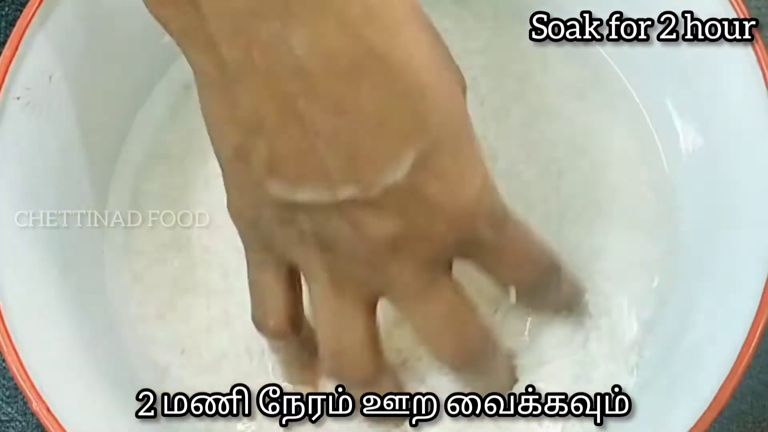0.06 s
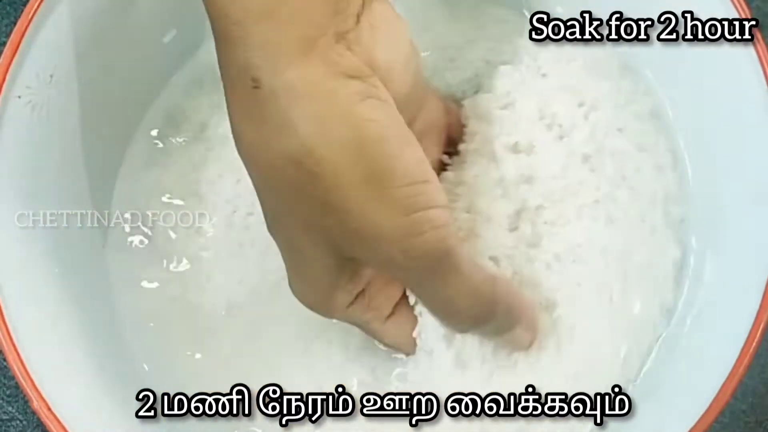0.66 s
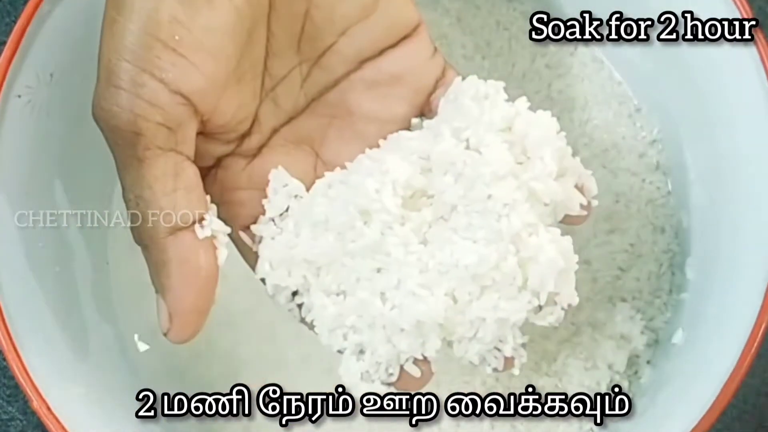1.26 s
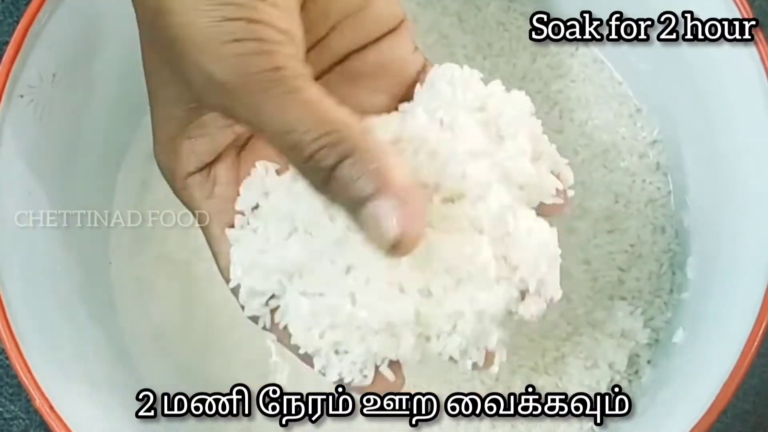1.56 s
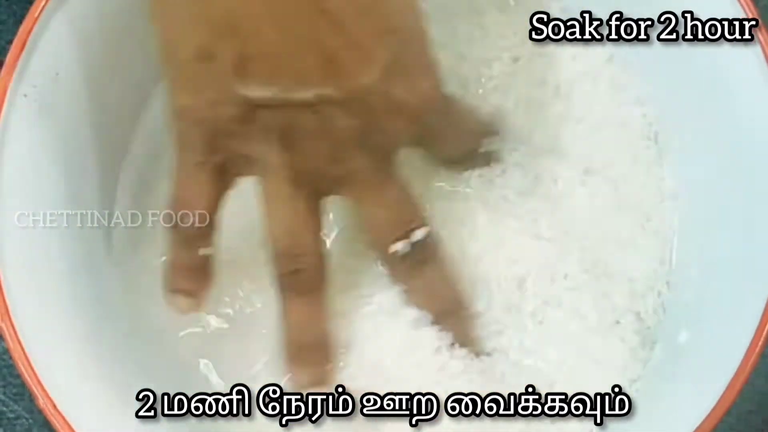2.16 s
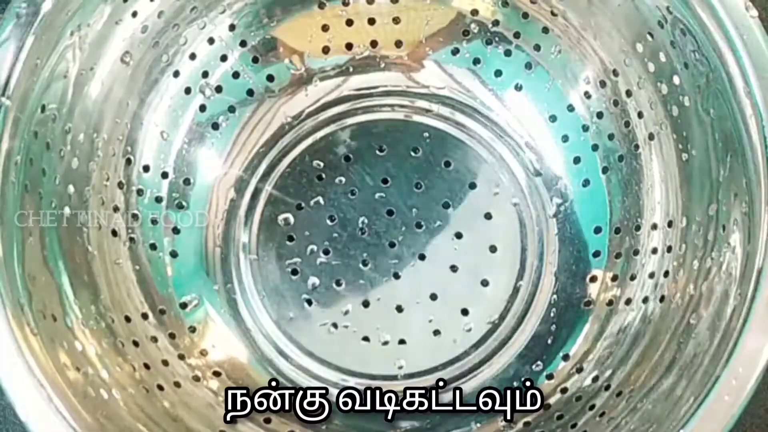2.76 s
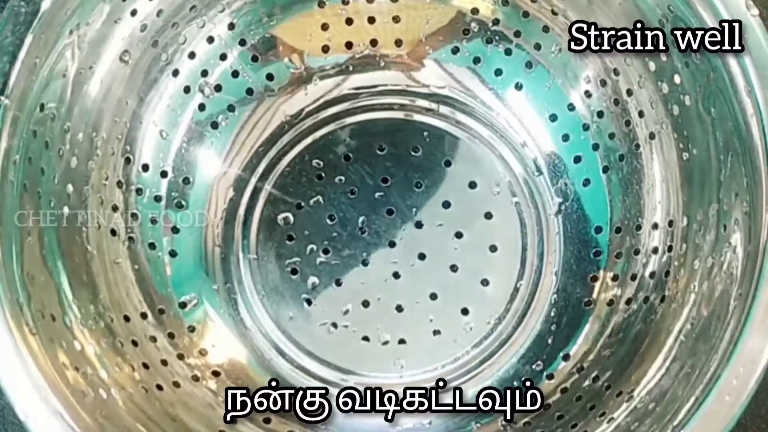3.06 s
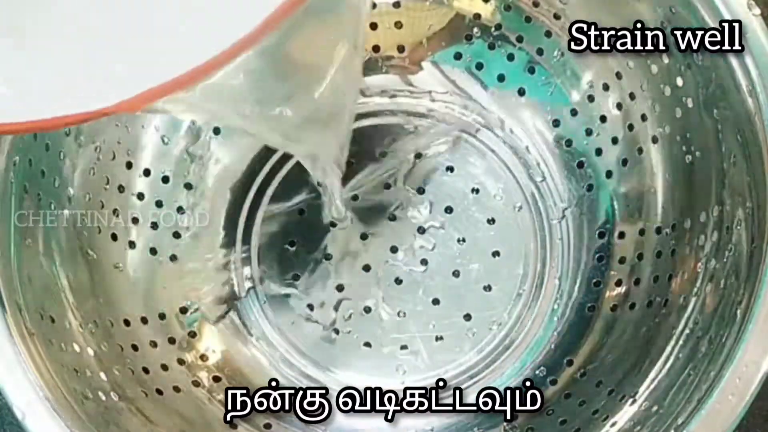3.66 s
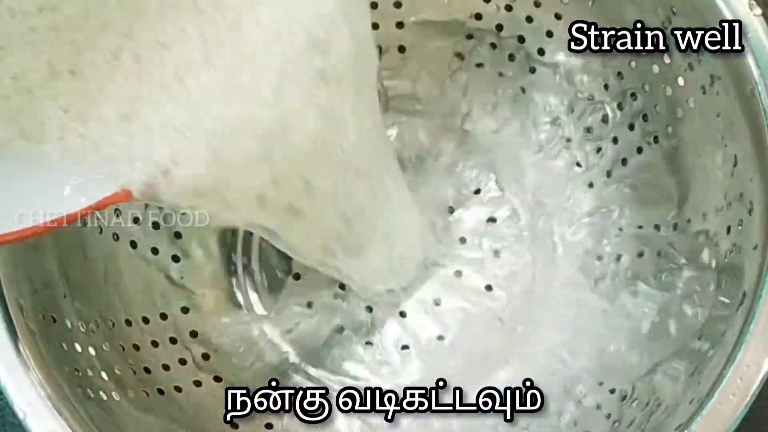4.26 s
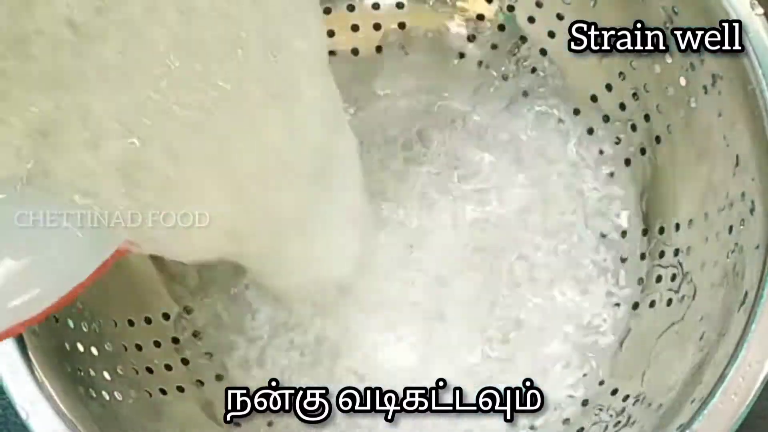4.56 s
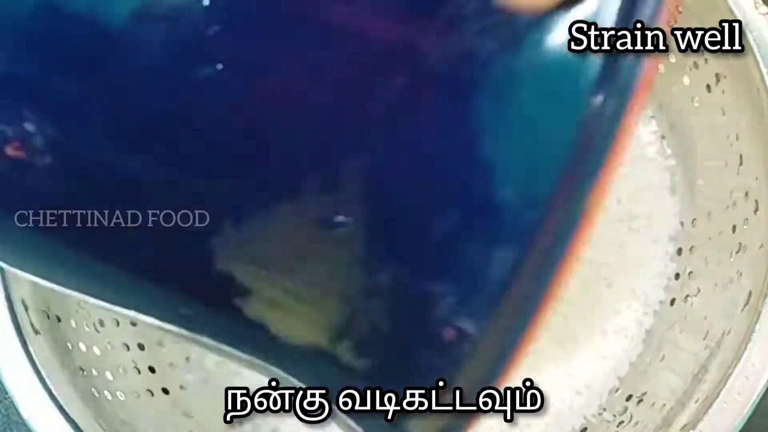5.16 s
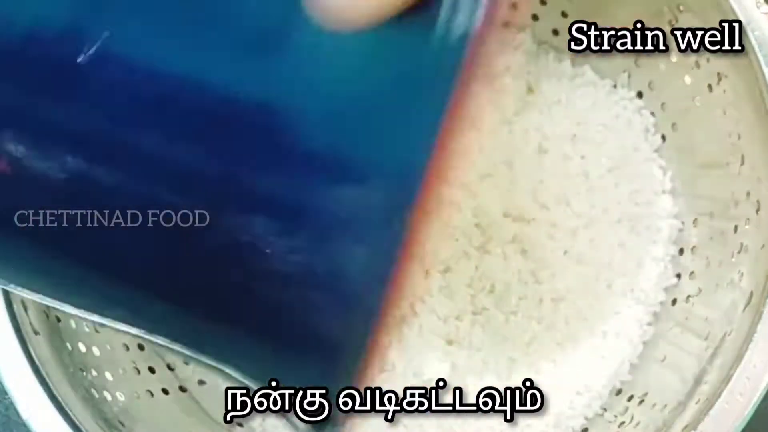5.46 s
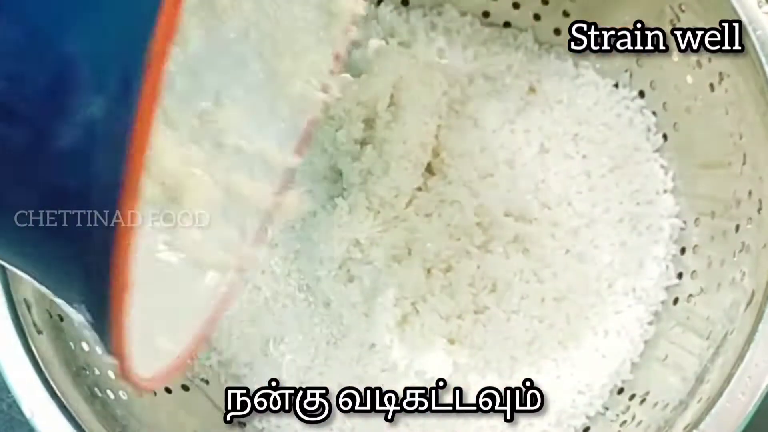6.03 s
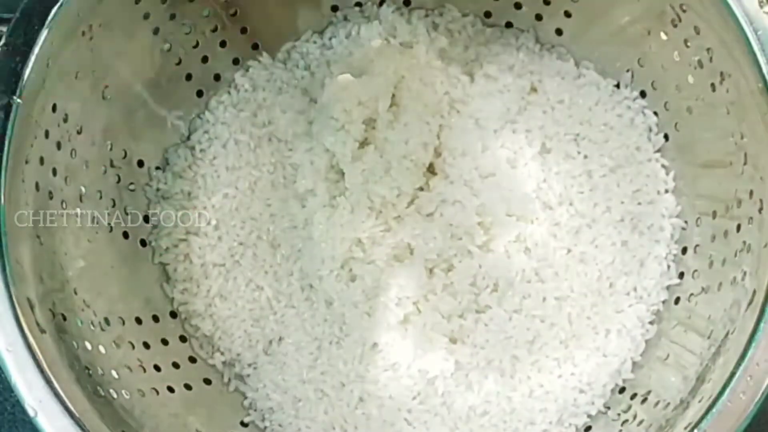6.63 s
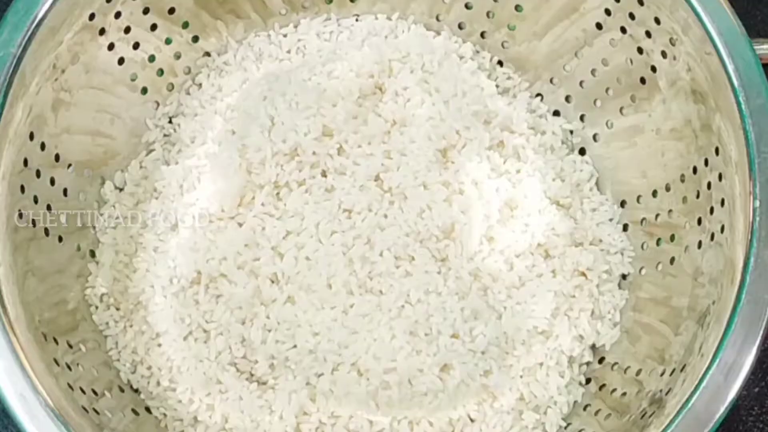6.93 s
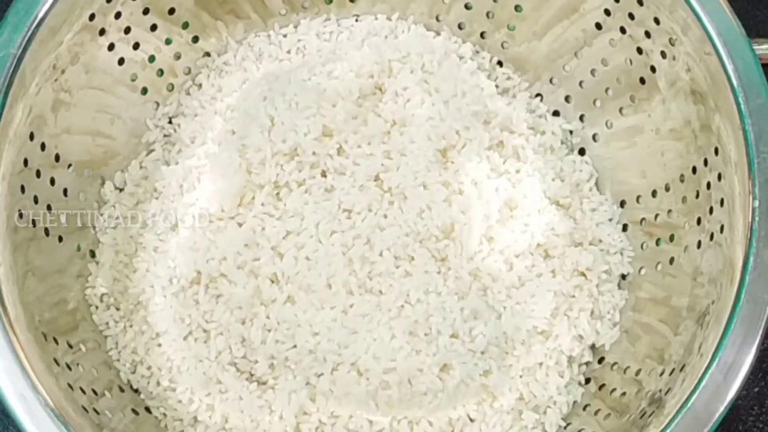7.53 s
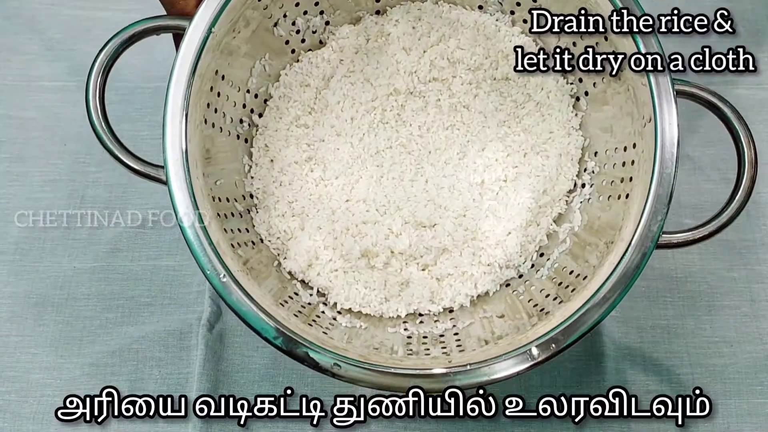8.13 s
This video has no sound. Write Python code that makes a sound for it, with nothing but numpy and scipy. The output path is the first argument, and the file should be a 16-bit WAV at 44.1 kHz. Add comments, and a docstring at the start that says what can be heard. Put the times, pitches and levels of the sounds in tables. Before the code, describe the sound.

Soft sloshing and plinking drips, a knock on steel, then water pours through a colander and wet rice slides after.

```python
"""A small kitchen. A hand stirs soaking rice in a plastic basin and lifts a handful, which drips back:
each drop slaps the water and traps a ringing bubble. The basin knocks a steel colander, water gushes
through it, wet rice slides after in clumps and the rest trickles away. Dull bumps on the worktop and a
low hum lie underneath. The sound comes in three stretches with silence between them."""
import sys
import numpy as np
from scipy import signal
from scipy.fft import rfft, irfft
from scipy.io import wavfile
from scipy.ndimage import uniform_filter1d, map_coordinates

SR = 44100
rng = np.random.default_rng(int(sys.argv[2]) if len(sys.argv) > 2 else 0)


def int16_out(signal):
    """Quantize to a 16-bit WAV file."""
    q = np.round(np.clip(np.atleast_2d(signal).T, -1, 1) * 32767)
    wavfile.write(sys.argv[1], SR, q.astype(np.int16))


N = 365588
TOP_HZ = 16000

# Spectra. Each row: frequency in Hz, relative level in dB.
LOW_SPECTRUM = [(25, -30.5), (55, -23.5), (90, -5.5), (124, 1), (147, -3), (171, 2), (250, -7), (420, -7),
                (600, -13), (1300, -45)]  # room hum, body of a slosh
AIRY_SPECTRUM = [(350, -28.5), (600, -8), (858, -7), (1880, -6.5), (2340, 0), (3250, -12), (3940, -26.5),
                 (4460, -22), (7940, -29), (15100, -32), (16000, -25.5)]  # room air, top of a slosh
DRUM_SPECTRUM = [(60, -26), (130, 7), (240, -9), (450, -11.5), (900, -8.5), (2000, -30.5)]  # drive of a vessel's low note
# Colander modes. Each row: frequency in Hz, level in dB, T60 in seconds.
STEEL_MODES = [(327.5, -16.5, 0.73), (530, -20.5, 0.57), (861, -17.5, 0.076), (1337, -11.5, 0.18),
               (1430, -9, .3), (1644, -11.5, 0.19), (2080, -13.5, 0.35), (2325, -13, 0.41),
               (2321, -4, 0.38), (2550, -14.5, 0.42), (2530, -4, 0.31), (2960, -18, 0.22),
               (4470, -16, 0.16), (5920, -14, .25), (6450, -18, 0.13), (6860, -13.5, 0.17),
               (8140, -16.5, .16)]


def amp(db):
    """Decibels to gain."""
    return 10 ** (np.asarray(db) / 20)


def unit(x):
    """Scale to rms 1."""
    return x / np.sqrt(np.mean(x ** 2) + 1e-20)


def along(points, hz):
    """Interpolate (Hz, value) points on a log frequency axis."""
    f, v = np.transpose(points)
    return np.interp(np.log(hz + 1), np.log(f + 1), v)


def curve_db(rows):
    """Level per sample from (s, dB) rows; -120 dB outside them."""
    return np.interp(np.arange(N) / SR, *np.transpose(rows), left=-120, right=-120)


def wobble(per_s):
    """Smooth random curve with per_s knots a second."""
    return map_coordinates(rng.standard_normal(int(N * per_s / SR) + 4), [np.arange(N) * per_s / SR])


def swells(rows, release=1):
    """Gain from (peak s, dB, rise s) rows: Gaussian rise, exponential decay over release * rise."""
    gain, t = np.zeros(N), np.arange(N) / SR
    for peak_s, db, rise_s in rows:
        u = (t - peak_s) / rise_s
        gain += amp(db) * np.exp(-np.where(u < 0, u ** 2, u / release))
    return gain


def held(start_s, end_s, rise_s, fade_s):
    """Gain of 1 from start_s to end_s, with exponential flanks."""
    t = np.arange(N) / SR
    return np.exp(-np.maximum(start_s - t, 0) / rise_s - np.maximum(t - end_s, 0) / fade_s)


def add(track, start_s, sound):
    """Mix a sound into the track."""
    part = track[max(round(start_s * SR), 0):][:len(sound)]
    part += sound[:len(part)]


def coloured(x, spectrum, size=4096):
    """Minimum-phase filter of energy 1, shaped by (Hz, dB) points."""
    cepstrum = irfft(np.log(amp(along(spectrum, np.fft.rfftfreq(size, 1 / SR)))))
    cepstrum[1:size // 2] *= 2
    cepstrum[size // 2 + 1:] = 0
    response = irfft(np.exp(rfft(cepstrum)))
    return signal.fftconvolve(x, response / np.linalg.norm(response))[:len(x)]


def resonance(x, hz, width_hz):
    """One resonance whose pitch follows hz, rms 1."""
    turn = np.exp(2j * np.pi * np.cumsum(hz * np.ones(N)) / SR)
    pole = np.exp(-np.pi * width_hz / SR)
    return unit((turn * signal.lfilter([1], [1, -pole], x / turn)).real)


def ring(modes, t60_scale=1):
    """Half a second of a struck body's decaying modes."""
    t = np.arange(SR // 2) / SR
    return sum(amp(db - 60 * t / (t60_s * t60_scale)) * np.sin(2 * np.pi * (hz * t + rng.random()))
               for hz, db, t60_s in modes)


def impacts(per_s, spread_db):
    """Tiny blows of uneven size at random moments, rms 1."""
    chance, size, sign = rng.random(N), rng.standard_normal(N), rng.choice([-1, 1], N)
    return unit((chance < per_s / SR) * sign * amp(spread_db * np.minimum(size, 2)))


def bubble(t, hz, life_s, glide, rise_cycles):
    """A trapped bubble rings up, rises in pitch and is choked at the surface."""
    tone = np.sin(2 * np.pi * hz * t * (1 + glide * t / life_s))
    return tone * amp(-60 * (t / life_s) ** 1.37) * (1 - np.exp(-t * hz / rise_cycles))


def bubbles(per_s, centre_hz, octaves, cycles, spread_db):
    """A swarm of bubbles of random pitch and level, rms 1."""
    most, samples = 6000, np.arange(800)
    start = rng.integers(0, N, (most, 1))
    pitch, level = np.clip(rng.standard_normal((2, most, 1)), -2, 2)
    n = int(np.clip(per_s * N / SR, 1, most))
    hz = np.minimum(centre_hz * 2 ** (octaves * pitch[:n]), TOP_HZ)
    rings = amp(spread_db * level[:n]) * bubble(samples / SR, hz, cycles / hz, 0.052, rise_cycles=2.4)
    return unit(np.bincount((start[:n] + samples).ravel(), rings.ravel(), N)[:N])


def spatter(per_s, centre_hz, octaves, spread_db):
    """Separate droplets: ticks of a few cycles and some tiny bubbles, rms 1."""
    ticks = bubbles(per_s, centre_hz, octaves, cycles=9, spread_db=spread_db)
    pings = bubbles(per_s / 4, centre_hz * .8, octaves, cycles=45, spread_db=spread_db)
    return unit(ticks + amp(-8) * pings)


def vessel(x, t60_s, wall_db):
    """Sound bounces between a vessel's close walls, rms 1."""
    t = np.arange(SR // 10) / SR
    echoes = rng.standard_normal(len(t)) * amp(-60 * t / t60_s)
    return unit(x + amp(wall_db) * signal.fftconvolve(x, echoes / np.linalg.norm(echoes))[:N])


def background():
    """Low hum, airy noise, one rustle and a faint whine that gives way to thin hiss near the end."""
    # Room noise steps. Each row: start in seconds, hum in dB, air in dB, pitch ratio of the air.
    steps = [(0, -66.5, -72, 0.92), (3.105, -66.5, -67, 0.91), (7.037, -66, -68.5, 1.07),
             (7.645, -70, -72.5, 1.05)]
    # Hiss spectrum and whine tones. Each row: frequency in Hz, level in dB.
    hiss_spectrum = [(4500, -48.5), (5500, -14), (6300, 2), (7800, -2.5), (8400, -5), (9200, -39)]
    whine_tones = [(2256, -83), (2912, -83), (3160, -84.5)]
    start_s, hum_db, air_db, ratios = np.transpose(steps)
    t = np.arange(N) / SR
    step = np.searchsorted(start_s[1:], t)
    hum = amp(hum_db[step]) * coloured(rng.standard_normal(N), LOW_SPECTRUM)
    noise = rng.standard_normal(N)
    airy = sum((step == k) * coloured(noise, np.multiply(AIRY_SPECTRUM, [ratio, 1]))
               for k, ratio in enumerate(ratios))
    rustle = swells([(7.09, -63, .055)])
    air = np.hypot(amp(air_db[step] + 0.64 * wobble(5)), rustle) * airy
    hiss = amp(-76) * coloured(rng.standard_normal(N), hiss_spectrum)
    whine = sum(amp(db + wobble(5)) * np.sqrt(2) * np.sin(2 * np.pi * hz * t + wobble(5.2))
                for hz, db in whine_tones)
    return hum + air + np.where(step == len(steps) - 1, hiss, whine)


def slosh():
    """Water rocks in a vessel: a low wash with a lighter top, rms 1."""
    wash = coloured(rng.standard_normal(N), LOW_SPECTRUM)
    return unit(wash + amp(-0.5) * coloured(impacts(per_s=3800, spread_db=2), AIRY_SPECTRUM))


def stirring():
    """Fingers rake wet grains in rocking water; the hand lifts, the basin hums and droplets patter."""
    # Raked grains. Each row: frequency in Hz, relative level in dB.
    swish_spectrum = [(300, -19.5), (1100, -19.5), (1700, -17.5), (2350, -4), (3900, -21), (5100, -11),
                      (8100, -18), (9800, -15), (16000, -18)]
    # Finger strokes. Each row: peak in seconds, level in dB, rise in seconds.
    strokes = [(.31, -72.5, 0.18), (.73, -66.5, 0.032), (1.55, -64.5, 0.032), (1.657, -41, 0.00617),
               (1.762, -39.5, 0.024), (1.81, -46.5, 0.032), (1.855, -40, 0.018), (2.01, -54, 0.049)]
    # Rocking of the water. Each row: time in seconds, level in dB.
    slosh_levels = [(.05, -67.5), (.25, -63.5), (.85, -66.5), (1.5, -62), (2.0, -57.5), (2.3, -61.5),
                    (2.58, -61)]
    grains = impacts(per_s=4500, spread_db=4.5)
    grains += amp(-1) * spatter(per_s=500, centre_hz=6000, octaves=.8, spread_db=4.5)
    hollow = resonance(coloured(rng.standard_normal(N), DRUM_SPECTRUM), hz=425, width_hz=28.4)
    swish = vessel(coloured(grains, swish_spectrum), t60_s=.05, wall_db=-10)
    rocking = amp(curve_db(slosh_levels)) * (slosh() + amp(-19.5) * swish)
    droplets = spatter(per_s=48, centre_hz=8000, octaves=1, spread_db=5)
    patter = vessel(droplets, t60_s=.05, wall_db=-2)
    lifted = amp(-69.5) * held(0.68, 1.346, rise_s=.1, fade_s=.1)
    dripping = amp(-76.5) * held(0.917, 2.17, rise_s=0.011, fade_s=0.13)
    return swells(strokes) * swish + rocking + lifted * hollow + dripping * patter


def bumps():
    """A soft push wakes the worktop modes near its own pitch."""
    # Pushes. Each row: start in seconds, level in dB, pitch in Hz.
    pushes = [(0.1, -45, 253), (1.228, -48, 228), (3.284, -21, 147.2), (3.483, -57, 422),
              (6.016, -41.5, 478), (7.648, -38, 378), (7.655, -29.5, 167.5), (8.236, -57, 440)]
    # Worktop modes. Each row: frequency in Hz, level in dB, T60 in seconds.
    worktop_modes = [(125.7, -7.5, 0.41), (137.2, -13, 0.28), (179.8, -1, 0.29), (209, -2.5, 0.19),
                     (286.4, -1.5, 0.31), (447.4, -2, 0.21), (500.5, -1.5, 0.207)]
    push_s, rise_s = 0.028, 0.0059
    out, t = np.zeros(N), np.arange(SR // 2) / SR
    for start_s, db, hz in pushes:
        modes = [(f, level - 9 * np.log2(f / hz) ** 2, t60_s) for f, level, t60_s in worktop_modes]
        push = np.sin(2 * np.pi * hz * t) * np.sin(np.pi * np.minimum(t / push_s, 1)) ** 2
        body = ring(modes) * (1 - np.exp(-(t / rise_s) ** 2))
        add(out, start_s, amp(db) * (amp(-9) * body + amp(-4.5) * push))
    return out


def drips():
    """Each drop slaps the water and traps a bubble; the restless surface makes its ring flutter."""
    # Drops. Each row: start in seconds, bubble level in dB, bubble pitch in Hz, slap level in dB.
    drops = [(0.917, -48, 5000, -36), (.942, -45, 3380, -37.5), (.958, -36.5, 4780, -42),
             (1.086, -42.5, 4570, -46), (1.119, -28, 2200, -63), (1.16, -41.5, 2170, -51),
             (1.2337, -31.5, 1220, -36), (1.2324, -34, 2280, -48), (1.331, -33.5, 2305, -41.5),
             (1.4254, -30, 1890, -45), (1.531, -36, 2016, -45), (1.549, -47, 1136, -60),
             (1.576, -38, 2070, -80), (1.657, -31, 2520, -44), (1.6915, -39.5, 1920, -32),
             (1.746, -25.5, 2600, -38), (1.7793, -28, 2140, -39.5), (1.8321, -30, 2710, -44),
             (3.563, -39, 5780, -45), (3.604, -45, 3450, -39.5), (3.839, -27.5, 3190, -46),
             (3.862, -29.5, 3050, -35), (3.8971, -23.5, 2340, -24), (3.9516, -20.5, 2265, -27),
             (4.071, -14, 2358, -34.5), (4.156, -8.5, 2030, -37), (4.1685, -11, 2220, -39.5),
             (4.2766, -17, 2426, -39), (4.8444, -9.5, 2380, -27.5), (4.869, -18, 2210, -36.5),
             (4.953, -20, 2310, -22.5), (5.204, -36, 2430, -34), (5.7117, -31.5, 2310, -36)]
    # Mean slap spectrum. Each row: frequency in Hz, relative level in dB.
    slap_spectrum = [(150, -16.5), (600, -13), (1200, -10), (2300, 2.5), (3600, -7), (5000, 1.5),
                     (9000, -6.5), (16000, -5.5)]
    life_cycles, slap_rise_s, slap_t60_s, basin_t60_s = 45, 0.0016, .013, 0.041
    out, t = np.zeros(N), np.arange(SR // 6) / SR
    flutter = amp(3 * wobble(700))
    envelope = amp(-60 * t / slap_t60_s) * (1 - np.exp(-t / slap_rise_s))
    for start_s, bubble_db, hz, slap_db in drops:
        colour = [(f, db + 4 * rng.standard_normal()) for f, db in slap_spectrum]
        slap = coloured(rng.standard_normal(len(t)) * envelope, colour)
        note = bubble(t, hz, life_cycles / hz, glide=.04, rise_cycles=1.2)
        note *= flutter[round(start_s * SR):][:len(t)]
        add(out, start_s, amp(bubble_db) * note + amp(slap_db) * slap)
    walls = rng.standard_normal(len(t)) * amp(-60 * t / basin_t60_s)
    return out + amp(-11.5) * signal.fftconvolve(out, walls / np.linalg.norm(walls))[:N]


def knocks():
    """The basin's rim scrapes the colander and leaves it ringing."""
    # Contacts. Each row: start in seconds, ring in dB, scrape in dB, scrape in seconds, T60 factor.
    contacts = [(3.283, -26.5, -30, 0.031, 0.9), (3.4839, -43, -27, .005, 0.51)]
    # Rim on steel. Each row: frequency in Hz, relative level in dB.
    scrape_spectrum = [(180, -41), (300, -28), (537, 4), (689, -27), (930, -2), (1150, -14.5), (1390, -1),
                       (1780, -10.5), (2320, 6), (3460, -21), (4370, -18), (5520, -17.5), (5900, -12.5),
                       (9240, -18), (16000, -27)]
    out, t = np.zeros(N), np.arange(SR // 2) / SR
    for start_s, ring_db, scrape_db, scrape_s, t60_scale in contacts:
        scrape = coloured(rng.standard_normal(len(t)) / (1 + (t / scrape_s) ** 3), scrape_spectrum)
        steel = ring(STEEL_MODES, t60_scale) * (1 - np.exp(-6 * t / scrape_s))
        add(out, start_s, amp(ring_db) * steel + amp(scrape_db) * scrape)
    return out


def spray(level_db, drops):
    """Water sprays through the holes and drops ring the steel; strong flow merges droplets into hiss."""
    # Spray. Each row: frequency in Hz, relative level in dB.
    spectrum = [(1940, -35.5), (3300, -1), (4020, -21), (4470, 1.5), (5310, -8.5), (5940, 2), (6520, -8.5),
                (7290, -2.5), (8430, -6), (9130, -13.5), (9940, -4.5), (11900, -13.5), (14600, -7),
                (15200, -8), (16000, -4)]
    hiss_share = np.maximum(1 / (1 + amp(2 * (-40 - level_db))), .25)
    droplets = unit(coloured(spatter(per_s=280, centre_hz=7500, octaves=.7, spread_db=5), spectrum))
    hiss = unit(coloured(impacts(per_s=7400, spread_db=2.5), spectrum))
    jets = vessel(np.sqrt(hiss_share) * hiss + (1 - hiss_share) * droplets, t60_s=.04, wall_db=-12)
    pings = bubbles(per_s=170, centre_hz=5500, octaves=.5, cycles=70, spread_db=3.5)
    steel = unit(signal.fftconvolve(drops, ring(STEEL_MODES))[:N])
    return amp(level_db) * (jets + amp(-13.5) * pings + amp(-14.5) * steel)


def pouring():
    """The stream breaks into drops that gush in the pool, slap steel, spray and drum on the bottom."""
    # Stream strength. Each row: time in seconds, level in dB re full flow.
    flow = [(3.52, -34.5), (3.73, -39), (3.8, -28), (3.9, -15.5), (4.08, -1.5), (4.33, 1), (4.52, -4),
            (4.68, -8), (4.96, -7), (5.09, -25.5), (5.42, -39)]
    # Colander under load. Each row: time in seconds, bottom pitch in Hz, gush pitch in Hz.
    load = [(3.75, 466.6, 2330), (4.17, 379, 2320), (4.34, 321.7, 2280), (4.75, 345.5, 2710),
            (4.953, 339, 2370)]
    # Pool and bare steel spectra. Each row: frequency in Hz, relative level in dB.
    gush_spectrum = [(700, -46), (1500, -19.5), (2000, -1.5), (2650, -0.5), (3200, -6), (4000, -11),
                     (6000, -35)]
    slap_spectrum = [(300, -30.5), (600, -12.5), (780, -12), (1280, 1.5), (1700, 3), (3000, -18.5)]
    # Rice masses hit the bottom. Each row: peak in seconds, level in dB, rise in seconds.
    thuds = [(4.17, -47.5, 0.035), (4.34, -41, 0.054), (4.45, -46, 0.022)]
    flow_db = curve_db(flow)
    times_s, *pitches = np.transpose(load)
    bottom_hz, gush_hz = [np.interp(np.arange(N) / SR, times_s, hz) for hz in pitches]
    surge = amp(1.2 * wobble(45))  # the stream arrives in lumps
    drops = impacts(per_s=2200, spread_db=2.5)

    froth = bubbles(per_s=400, centre_hz=2300, octaves=.35, cycles=35, spread_db=3)
    glugs = bubbles(per_s=70, centre_hz=2300, octaves=.13, cycles=48, spread_db=3)
    pool = coloured(drops + amp(-14.5) * froth, gush_spectrum)
    churn_hz = 80 * wobble(40)
    gush = resonance(pool, gush_hz + churn_hz, width_hz=350) + amp(-10) * glugs
    gush_db = -27 + 0.99 * flow_db

    plops = bubbles(per_s=200, centre_hz=1217, octaves=0.44, cycles=38, spread_db=-2.5)
    slap = unit(coloured(impacts(per_s=570, spread_db=4.5) + amp(-11.5) * plops, slap_spectrum))
    bare = held(3.96, 4.28, rise_s=.015, fade_s=0.067)  # until rice covers the steel
    slap_db = -51 + 0.46 * flow_db + 11 * bare
    spray_db = np.minimum(-31.5 + 0.84 * flow_db, -34.5)  # the holes pass only so much
    water = amp(gush_db) * gush + amp(slap_db) * slap + spray(spray_db, drops)

    drum = resonance(coloured(drops, DRUM_SPECTRUM), bottom_hz, width_hz=46)
    undamped = held(0, 4.57, rise_s=1, fade_s=0.62)  # the growing heap deadens the bottom
    drum_gain = np.hypot(amp(-51 + .3 * flow_db) * undamped, swells(thuds))
    splats = vessel(spatter(per_s=150, centre_hz=4800, octaves=.5, spread_db=3.5), t60_s=.03, wall_db=-6)
    front = swells([(3.9, -47.5, .08)])  # the stream's front breaks on the steel
    return surge * water + drum_gain * drum + front * splats


def rice():
    """Wet clumps land as showers of grains; water gurgles as the basin tips and drains from the heap."""
    # Landings. Each row: peak in seconds, level in dB, rise in seconds.
    clumps = [(4.99, -36, 0.033), (5.44, -42.5, 0.012), (5.503, -36.5, 0.012), (5.655, -32, 0.013),
              (5.695, -43.5, 0.013), (5.738, -42, .01), (5.863, -35, 0.016)]
    # Wet rice. Each row: frequency in Hz, relative level in dB.
    spectrum = [(250, -24), (800, -16.5), (1360, -10), (1660, -33), (2320, -3), (3950, -11.5), (6000, 1.5),
                (7440, -0.5), (9090, -2.5), (10200, -2.5), (13000, -4), (16000, 1.5)]
    squelch = spatter(per_s=700, centre_hz=7000, octaves=.8, spread_db=4)
    air_pockets = bubbles(per_s=350, centre_hz=2300, octaves=.35, cycles=25, spread_db=2)
    grains = unit(coloured(impacts(per_s=7200, spread_db=5) + amp(-3) * squelch, spectrum))
    landings = swells(clumps, release=1.85) * (grains + amp(-18) * air_pockets)
    ticks = amp(-5) * impacts(per_s=4000, spread_db=4)
    ticks += spatter(per_s=150, centre_hz=10000, octaves=.5, spread_db=5)
    trickle = vessel(coloured(ticks, spectrum), t60_s=.04, wall_db=-8)
    drained_s = 6.067
    draining = amp(-61.5) * held(5.1, drained_s, rise_s=0.057, fade_s=0.064)
    seeping = amp(-75.5) * held(drained_s, 6.72, rise_s=.05, fade_s=0.089)
    gurgle = amp(-61) * held(3.2, drained_s, rise_s=0.09, fade_s=0.064) * slosh()
    return landings + (draining + seeping) * trickle + gurgle


def kitchen(x):
    """Hard walls reverberate; the treble dies first."""
    # Room decay. Each row: frequency in Hz, T60 in seconds.
    decay = [(150, 0.61), (2000, 0.13), (12000, 0.031)]
    hz, t, noise = signal.stft(rng.standard_normal(SR // 2), SR, nperseg=256)
    tail = signal.istft(noise * amp(-60 * t / along(decay, hz)[:, None]), SR, nperseg=256)[1]
    delayed = np.pad(x, (200, 0))
    return signal.fftconvolve(delayed, tail / np.linalg.norm(tail))[:N]


def scene():
    """All sources in the room, alike in both channels; the deep basin keeps the drips drier."""
    near = stirring() + pouring() + rice() + knocks() + bumps()
    drops = drips()
    mono = near + drops + amp(-17) * kitchen(near + drops / 2) + background()
    return np.array([mono, mono])


def record(dry):
    """Gate to three stretches and low-pass at TOP_HZ."""
    # Audible stretches. Each row: start in seconds, end in seconds.
    stretches = [(0, 2.578), (3.105, 6.84), (7.037, 8.4)]
    t = np.arange(N) / SR
    gate = sum(1. * ((t >= start_s) & (t < end_s)) for start_s, end_s in stretches)
    lowpass = signal.ellip(12, .1, 80, TOP_HZ, fs=SR, output="sos")
    return signal.sosfilt(lowpass, dry * uniform_filter1d(gate, size=256))


dry = scene()
out = record(dry)
int16_out(out)
```